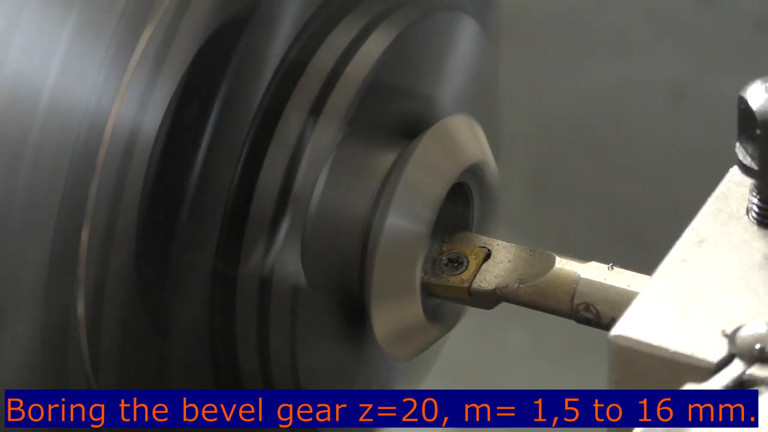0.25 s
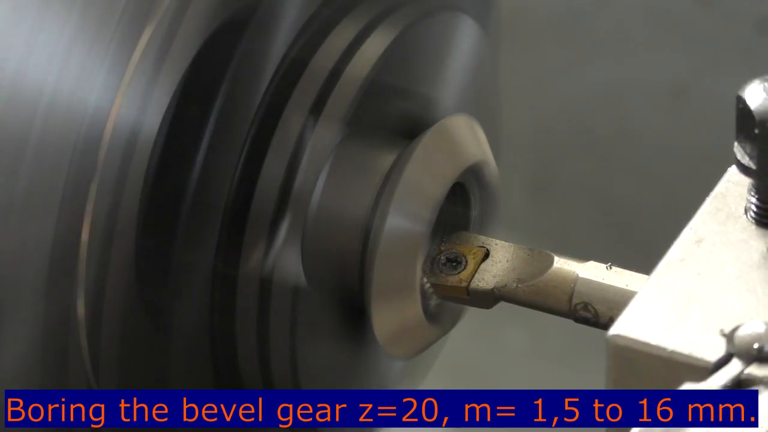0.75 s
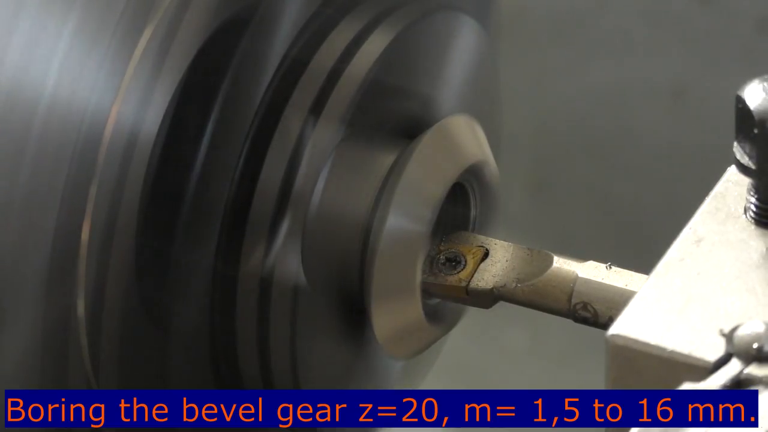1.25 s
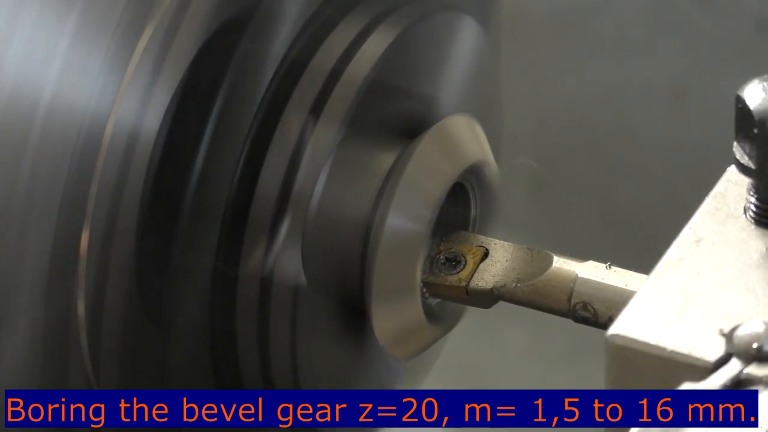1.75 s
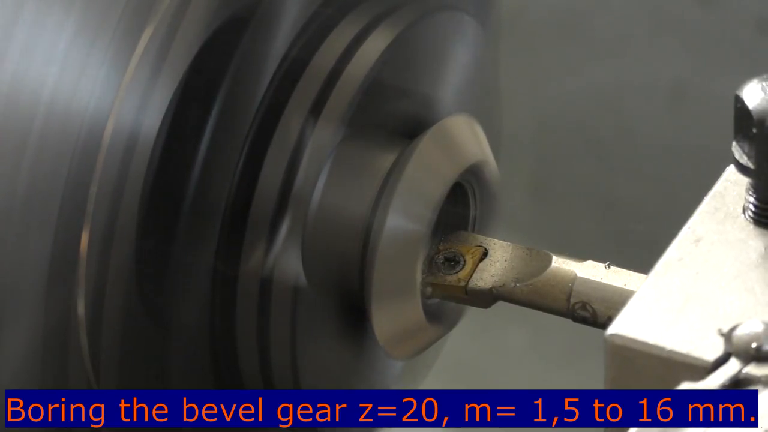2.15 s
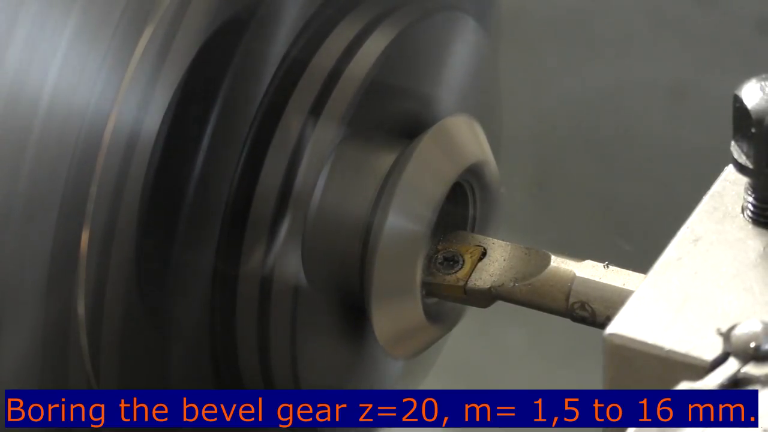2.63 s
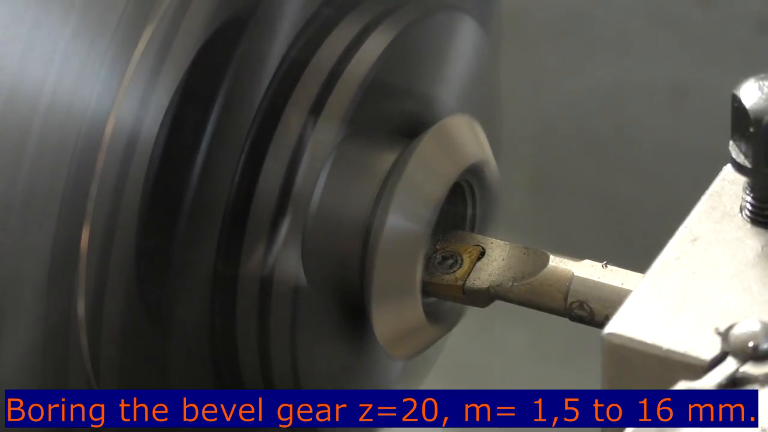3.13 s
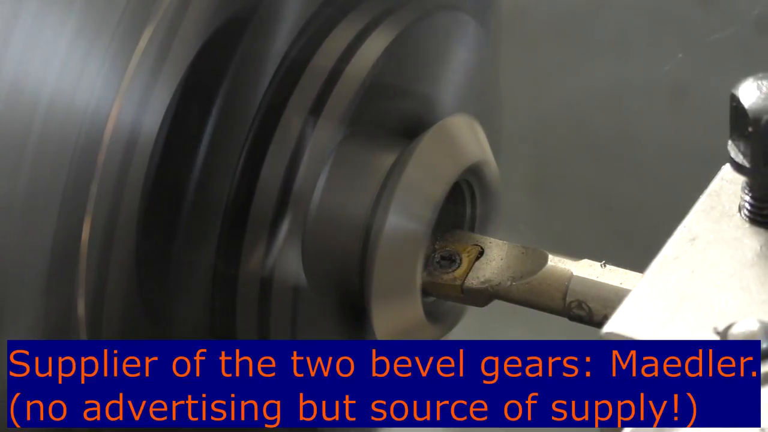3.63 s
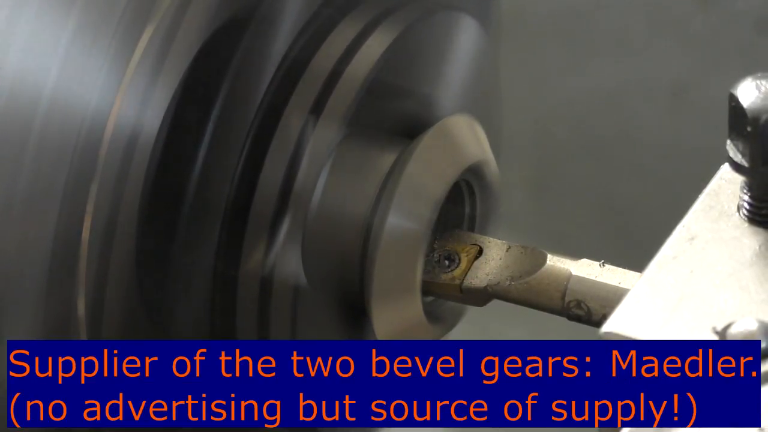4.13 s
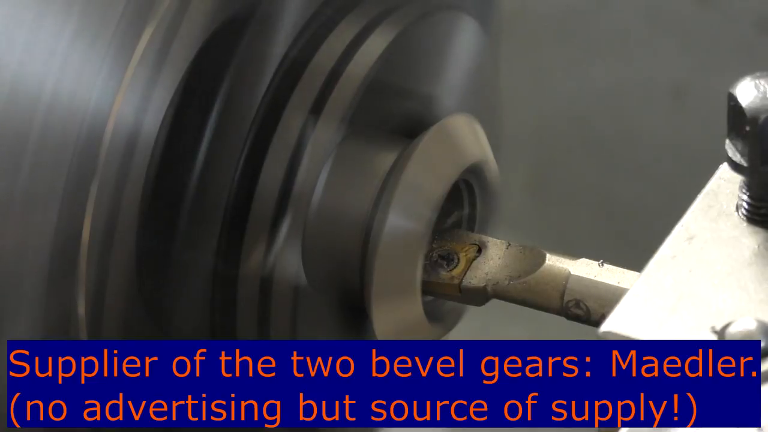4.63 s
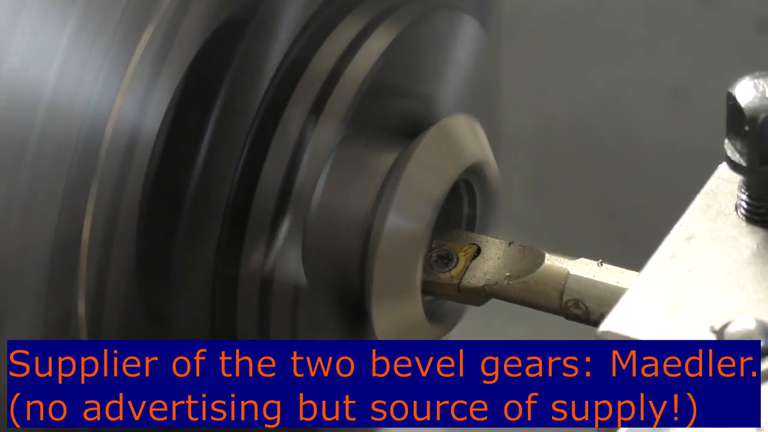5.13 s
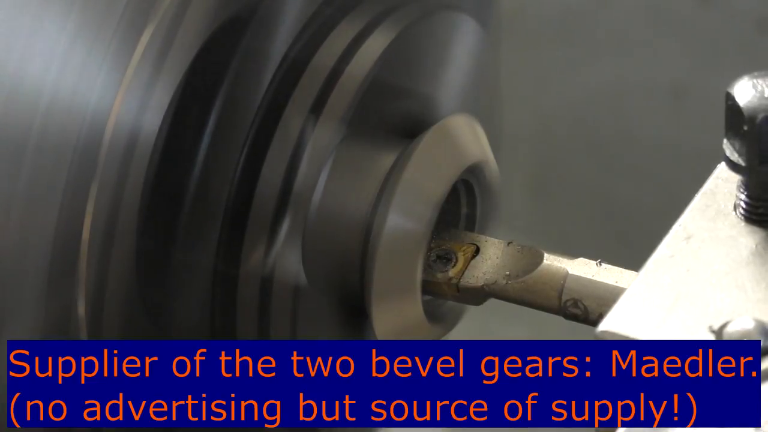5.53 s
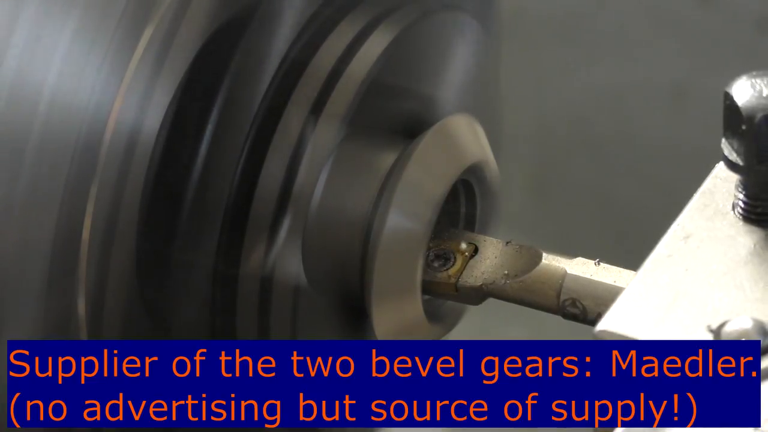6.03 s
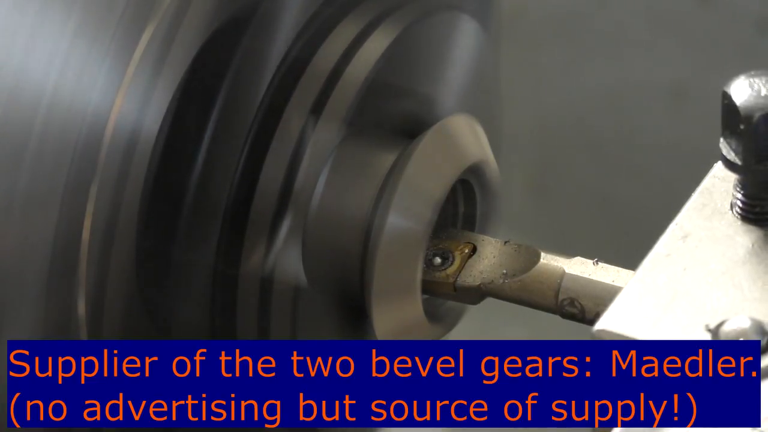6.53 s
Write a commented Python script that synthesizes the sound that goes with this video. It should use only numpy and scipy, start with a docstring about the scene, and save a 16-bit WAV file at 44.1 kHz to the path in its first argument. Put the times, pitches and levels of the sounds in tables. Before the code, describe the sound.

Close to a lathe in a workshop, a tool bores into turning steel with a fine, uneven hiss and a high metallic ring. The tool chirps several times, breaks into a piercing half-second squeal, then eases back. A second run of chirps and brief squeals follows past the middle before the ringing softens. Underneath, the machine rumbles and its motor whines in thin, wavering tones throughout.

```python
"""Boring steel on a lathe

A boring bar, a long tool holder, cuts inside a turning steel part. It rings near 3 kHz and
at times shakes hard enough to chirp or squeal: this is called chatter. The chip (the shaving)
hisses, the motor drive whines in thin tones, and the gears and machine bed rumble.
An automatic volume control turns everything down when the chatter gets loud."""
import sys
import numpy as np
from scipy import signal
from scipy.fft import rfft, irfft, next_fast_len
from scipy.io import wavfile
from scipy.ndimage import uniform_filter1d

SR = 44100
rng = np.random.default_rng(int(sys.argv[2]) if len(sys.argv) > 2 else 0)


def wav_out(sig):
    """Save sig, one row per channel (or a flat mono array), as 16-bit PCM at SR to the path in sys.argv[1]."""
    wavfile.write(sys.argv[1], SR, np.round(np.clip(np.atleast_2d(sig).T, -1, 1) * 32767).astype(np.int16))


N = 298998
T = np.arange(N) / SR
STUTTER_DB, STUTTER_HZ = 2.5, 130  # how much and how fast the grip of the cut varies


# The bar's ringing between bursts: t/s, level/dB
BAR_RINGING = [(0, -68), (.15, -42), (.35, -38.5), (.55, -35), (.7, -54), (.9, -31.5), (1.05, -27),
               (1.85, -26), (2.0, -38), (2.3, -33.5), (2.9, -37), (3.2, -45), (3.8, -37), (4.2, -34.5),
               (4.57, -41.5), (4.66, -33.5), (5.0, -31.5), (5.4, -38.5), (5.8, -40.5), (6.78, -40)]
# Short bursts of chatter: peak t/s, hold/s, level/dB, third harmonic/dB
CHATTER_BURSTS = [(0.152, .008, -30.5, -66), (0.189, 0.0091, -34, -66), (0.367, .025, -29, -66),
                  (0.422, .012, -19.5, -40), (0.503, 0.0074, -26, -66), (0.607, 0.0048, -27, -52),
                  (0.914, .004, -23.5, -58), (1.022, .004, -21, -55), (1.064, 0.011, -17.5, -60),
                  (1.681, 0.0049, -15.5, -43), (1.768, 0.028, -16, -36.5), (1.888, 0.011, -16.5, -38),
                  (2.45, 0.0081, -24.5, -52), (3.468, 0.0018, -31.5, -62), (3.66, .002, -29.5, -62),
                  (4.15, 0.031, -27, -65), (4.239, 0.0025, -19.5, -41), (4.277, 0.0023, -22, -50),
                  (4.342, .004, -26.5, -50), (4.717, 0.046, -17, -39), (4.786, 0.012, -22, -57),
                  (4.848, 0.075, -17.5, -52), (4.982, .006, -20.5, -44), (5.1, .005, -26.5, -61),
                  (5.27, .002, -26, -60), (5.31, 0.0028, -28.5, -60), (5.49, 0.0034, -30, -62),
                  (5.538, .002, -29.5, -62)]
# The long squeal, the edge leaving and hitting the metal: t/s, level/dB, third/dB, fifth harmonic/dB
LONG_SQUEAL = [(1.09, -28, -70, -70), (1.122, -12.5, -48, -53), (1.2, -11.5, -41, -36),
               (1.337, -8.5, -38, -34), (1.42, -8.5, -41, -27), (1.467, -12, -35, -28),
               (1.492, -16, -39, -23), (1.527, -11, -40, -25), (1.566, -12, -33, -25), (1.6, -12, -33, -20),
               (1.648, -10.5, -39, -40), (1.668, -46, -52, -56), (1.73, -80, -74, -64)]

def chatter():
    """How hard the bar shakes, in dB: the strongest of ringing, bursts and squeal wins."""
    squealing = (T > LONG_SQUEAL[0][0]) & (T < LONG_SQUEAL[-1][0])
    level_db, third_db, fifth_db = (np.where(squealing, curve(LONG_SQUEAL, k), -120.) for k in (1, 2, 3))
    level_db = np.maximum(level_db, curve(BAR_RINGING) + STUTTER_DB * drift(STUTTER_HZ))
    rise_db_per_s, fall_db_per_s = 435, 467
    for peak, hold, peak_db, harmonic_db in CHATTER_BURSTS:
        fade_db = rise_db_per_s * np.maximum(peak - T, 0) + fall_db_per_s * np.maximum(T - peak - hold, 0)
        level_db = np.maximum(level_db, peak_db - fade_db)
        third_db = np.maximum(third_db, harmonic_db - 1.5 * fade_db)
    return level_db, third_db, fifth_db


# The bar's pitch, higher when the cut grips harder: t/s, f/Hz
BAR_PITCH = [(0, 2958), (.3, 2950), (.38, 2983), (.43, 2986), (.52, 2954), (.75, 2922), (.92, 2927),
             (1.13, 2953), (1.2, 2971), (1.52, 2996), (1.6, 2991), (1.68, 2956), (1.89, 2951), (2.3, 2927),
             (4.1, 2916), (4.3, 2927), (4.55, 2930), (4.72, 2948), (4.82, 2932), (4.91, 2947), (5.1, 2928),
             (6.78, 2921)]

def boring_bar(level_db, third_db, fifth_db):
    """Shaken gently, the bar rings roughly; shaken hard, it locks into a clean tone."""
    locked = np.interp(level_db, [-40, -30, -14], [0, .93, .995])
    pole = np.exp(-np.pi * 55 / SR)  # keeps only slow changes, below about 55 Hz
    white = rng.standard_normal((4, N))
    slow = [evened(signal.lfilter([1], [1, -2 * pole, pole ** 2], row)) for row in white]
    shake, jitter = slow[0] + 1j * slow[1], slow[2] + 1j * slow[3]
    phase = 2 * np.pi * np.cumsum(curve(BAR_PITCH) + 6 * drift(top_hz=45)) / SR
    rough = shake + np.array([[.25], [-.25]]) * jitter  # pairs like this are left and right
    clean = np.sqrt(2) * np.exp([[-.12j], [.12j]])
    swing = locked * clean + np.sqrt(1 - locked ** 2) * rough
    tone = amp(level_db + np.array([[-1.3], [1.3]])) * (swing * np.exp(1j * phase)).real
    flutter_db = 2.0 * drift(top_hz=149.8)
    ragged = 1.05 + .62 * jitter  # no two blows of the edge are alike
    second_db = 0.75 * level_db - 31.0  # the swing is a little lopsided
    fourth_db = 0.71 * fifth_db - 14
    harmonics = sum(amp(db + flutter_db) * (ragged * np.exp(1j * k * phase)).real  # k times the pitch
                    for k, db in [(2, second_db), (3, third_db), (4, fourth_db), (5, fifth_db)])
    return tone + amp([[-1.2], [1.2]]) * harmonics


# Loudness of the hiss before chatter lifts it: t/s, level/dB
HISS_LEVEL = [(.09, -49.5), (.15, -44.5), (.5, -47.5), (1, -46.5), (2, -45.5), (4, -46), (4.6, -47.5),
              (5.05, -40), (6, -48), (6.78, -44)]
# Tone colour of the hiss: f/Hz, relative level/dB
HISS_COLOUR = [(4000, -32), (6800, -47), (6900, -15), (7400, -4), (7470, -13), (7990, -10.5), (8070, -17.5),
               (8780, -6), (10100, -6.5), (10300, -6.5), (12700, -2), (14000, -3), (15700, -7)]
# Thin rings in the hiss: f/Hz, width/Hz, level against the hiss/dB
HISS_RINGS = [(13650, 120, -9), (14050, 150, -14), (14430, 180, -15), (13300, 80, -19), (12050, 200, -18)]
# Notes at which bar and part sing along: f/Hz, width/Hz, level/dB
PART_RINGS = [(2824, 102, -40.5), (2773, 52, -47.5), (3003, 87, -48), (2450, 83, -47.5), (3256, 110, -50.5)]

def chip(bar_db):
    """The chip hisses in uneven spurts, louder during chatter, and sets bar and part ringing."""
    spurts_db = 0.71 * drift(top_hz=17) + 1.1 * drift(top_hz=300)
    hiss = evened(noise(lambda hz: amp(look_up(HISS_COLOUR, hz)) * np.clip((hz - 6000) / 1500, 0, 1)))
    rings = amp(1.8 * drift(top_hz=29.6)) * ringing_noise(HISS_RINGS)
    lift_from_db, smooth_s = -26, 0.091
    lift_db = .35 * uniform_filter1d(np.maximum(bar_db - lift_from_db, 0), round(smooth_s * SR))
    bite = np.clip((T - .08) / 0.11, .1, 1)  # the edge enters the metal
    part = bite * amp(STUTTER_DB * drift(STUTTER_HZ)) * ringing_noise(PART_RINGS)
    return amp(curve(HISS_LEVEL) + lift_db + spurts_db) * (hiss + rings) + part


# Tones of the motor drive: f/Hz, level/dB
DRIVE_TONES = [(5023.3, -63.9), (5112.1, -51.6), (5377.9, -59.3), (5466.7, -57.3), (5554.9, -45.1),
               (5732.5, -53.3), (5777.6, -56.4), (5821.4, -55.7), (5910.2, -43.2), (5998.3, -58.9),
               (6087.2, -47.7), (6221.1, -59.5), (6264.8, -42.7), (6309.2, -60.3), (6353.6, -59.7),
               (6442.5, -39.8), (6664.5, -57.2), (6885.9, -57.0), (7107.3, -50.4), (7151.0, -52.5),
               (7283.6, -62.7), (7683.3, -51.4), (7860.3, -63.7), (8126.8, -67.3), (10579.5, -57.8),
               (11111.8, -65.4), (11465.1, -59.9), (11819.7, -64.6), (12352.7, -66.6), (12530.3, -64.6)]
# Wavering of the four loudest tones, by pitch: t/s, lowest/dB, second/dB, upper two/dB
DRIVE_SWELL = [(0, -5, 5, 0), (.25, 3, 1, 1.5), (.43, -1, -5, 0.5), (.64, 3.9, -4, 1), (1, -3, -1, -.5),
               (1.4, -1, -1, 3.5), (1.85, -7, -1, -1.5), (2.15, -.7, 0, -3), (3.15, 3, -8, -1.5),
               (3.4, -1.5, -3, -3.5), (3.72, 1.5, -4, 0), (3.9, 0, 2, -2), (4.34, 1, 1.5, -1),
               (4.85, 2, 3, 2.5), (6.09, -3.5, 1, 1.5), (6.78, -.4, -1, -0.3)]
# Outline of the faint side tones: f/Hz, level/dB
SIDE_TONES = [(4800, -74), (5300, -69), (5600, -65), (6400, -65), (7000, -70), (8300, -75)]

def motor_drive():
    """Fast electrical switching whines in wavering tones over a faint, evenly spaced row of others."""
    whine = np.zeros((2, N))
    loudest = sorted(hz for hz, db in DRIVE_TONES if db > -46)
    for hz, db in DRIVE_TONES:
        if hz in loudest:
            swell_db = curve(DRIVE_SWELL, column=min(1 + loudest.index(hz), 3))
        else:
            swell_db = 1.2 * drift(top_hz=2.5)
        lag = rng.normal(0, 0.2) * np.array([[-1], [1]]) * (hz < 6800)  # higher tones sit in the centre
        whine += amp(db + swell_db) * np.sqrt(2) * np.cos(2 * np.pi * (hz * T + rng.random()) + lag)
    switching_hz, spacing_hz = 5998.7, 44.35
    for hz in switching_hz + spacing_hz * np.arange(-27, 52):
        if min(abs(hz - tone_hz) for tone_hz, _ in DRIVE_TONES) > 9:  # skip pitches already taken
            side_db = look_up(SIDE_TONES, hz) + rng.normal(0, 2.5)
            whine += amp(side_db) * np.sqrt(2) * np.cos(2 * np.pi * (hz * T + rng.random()))
    return whine


# Tone colour of the rumble: f/Hz, relative level/dB
RUMBLE_COLOUR = [(18, -52), (30, -31), (188, -8.5), (297, -11), (424, -6.5), (513, -15), (717, -9),
                 (1050, -12), (1210, -11), (2100, -14), (2860, -10.5), (3230, -17.5), (4610, -20),
                 (6290, -20.5), (9000, -27.5), (11700, -30.5), (19800, -120)]
# Notes at which gear case and covers ring: f/Hz, width/Hz, level/dB
COVER_RINGS = [(321.6, 21, -51), (406.7, 4.4, -52.5), (427.3, 12.4, -48.5), (594, 13, -52),
               (748.3, 21, -49), (1191, 122, -43.5), (1250.5, 31, -47), (1710, 29, -49.5),
               (1842, 91, -51.5), (5900, 840, -58.5)]
# Low notes of the bed and spindle housing: f/Hz, width/Hz, level/dB
BED_RINGS = [(91.2, 12, -53), (139, 24, -51.5), (177.7, 7.2, -39.5), (194.5, 32, -42.5), (239, 31, -43),
             (261, 28, -48.5)]
# How those low notes swell and sink: t/s, level change/dB
BED_SWELL = [(0, -3), (.3, 3), (.55, -2.5), (.8, 1), (1.6, -2.5), (2, 1.5), (2.6, -2.5), (3.25, 3.5),
             (3.6, -2), (4.6, 0), (6.2, 1.5), (6.78, 1.5)]
# A low motor tone that grows later on: t/s, level/dB
MOTOR_DRONE = [(0, -68), (.8, -56), (3.7, -52), (4.5, -60), (5, -47.5), (5.5, -57.5), (5.75, -47.5),
               (6.4, -47.5), (6.78, -50)]

def lathe_body():
    """The running machine rumbles, its covers ring, its bed booms, and motor and mains power hum."""
    rumble_db = -33.5 + 0.42 * drift(top_hz=6)
    rumble = amp(rumble_db) * evened(noise(lambda hz: amp(look_up(RUMBLE_COLOUR, hz))))
    mains_hz, drone_hz = 62.4, 88.9
    hum = amp(-61.5) * np.sqrt(2) * np.sin(2 * np.pi * mains_hz * T + np.array([[-.4], [.4]]))
    drone_db = curve(MOTOR_DRONE) + 1.5 * drift(top_hz=6.9)
    drone = amp(drone_db) * np.sqrt(2) * np.sin(2 * np.pi * drone_hz * T + 0.68 * drift(top_hz=4.6))
    covers = ringing_noise(COVER_RINGS)
    boom = amp(curve(BED_SWELL)) * ringing_noise(BED_RINGS)
    return rumble + covers + boom + hum + drone


# How alike the workshop makes left and right: f/Hz, likeness from 0 to 1
STEREO_LIKENESS = [(60, 0.38), (110, 0.97), (200, 1), (380, 0.91), (700, 0.68), (1290, 0.6), (2380, 0.68),
                   (4400, 0.72), (8120, 1), (15000, 1.0)]
# How much louder the left is than the right: f/Hz, level/dB
STEREO_BALANCE = [(60, -2.0), (110, -2.0), (200, -4.0), (380, -2.0), (700, -1.0), (1290, -0.5),
                  (2380, -3.0), (4400, 0.5), (8120, -0.5), (15000, 0.0)]

def noise(gain):
    """Stereo noise, with gain(hz) setting the strength of each frequency."""
    size = next_fast_len(N)
    hz = np.fft.rfftfreq(size, 1 / SR)
    middle, side = rfft(rng.standard_normal((2, size)))
    likeness = np.clip(look_up(STEREO_LIKENESS, hz), 0, 1)
    middle, side = middle * np.sqrt((1 + likeness) / 2), side * np.sqrt((1 - likeness) / 2)
    lean = amp(look_up(STEREO_BALANCE, hz) / 2)
    return irfft(gain(hz) * np.array([(middle + side) * lean, (middle - side) / lean]), size)[:, :N]


def ringing_noise(rings):
    """Metal shaken at random rings in a narrow band around each of its own notes."""
    def gain(hz):
        return np.sqrt(sum(amp(db) ** 2 * 2 * SR / (np.pi * width) / (1 + (2 * (hz - f) / width) ** 2) ** 2
                           for f, width, db in rings))
    return noise(gain)


def drift(top_hz):
    """A random wobble of typical size 1, no faster than top_hz."""
    t = T[::64]
    rates_hz = np.geomspace(top_hz / 12, top_hz, 12)
    wobble = sum(np.sin(2 * np.pi * (hz * t + rng.random())) / np.sqrt(hz) for hz in rates_hz)
    return np.interp(T, t, evened(wobble))


def curve(rows, column=1):
    """Join a table's points with straight lines over time."""
    return np.interp(T, *np.transpose(rows)[[0, column]])


def look_up(rows, hz):
    """A table's value at any frequency."""
    f, value = np.transpose(rows)
    return np.interp(np.log(hz + 1), np.log(f + 1), value)


def amp(db):
    """Turn decibels into a multiplier."""
    return 10 ** (np.asarray(db) / 20)


def evened(x):
    """Scale a signal to an average power of 1."""
    return x / np.sqrt(np.mean(x ** 2) + 1e-20)


def scene():
    """All sources together; the chatter steers both bar and chip."""
    level_db, third_db, fifth_db = chatter()
    return lathe_body() + motor_drive() + chip(level_db) + boring_bar(level_db, third_db, fifth_db)


def too_loud_db(dry, smooth_s, fall_db_per_s, limit_db=-24.0):
    """How far the smoothed level is over the limit; it rises at once and falls at a set speed."""
    power = uniform_filter1d((dry ** 2).mean(0), round(smooth_s * SR))
    level_db = 10 * np.log10(abs(power) + 1e-12)
    held_db = np.maximum.accumulate(level_db + fall_db_per_s * T) - fall_db_per_s * T
    return np.maximum(held_db - limit_db, 0)


def record(dry):
    """The volume control lets go fast after a chirp, slowly after a squeal; the top treble is cut."""
    fast_db = too_loud_db(dry, smooth_s=0.0092, fall_db_per_s=37)
    slow_db = too_loud_db(dry, smooth_s=0.038, fall_db_per_s=13.3)
    cut_db = 0.77 * uniform_filter1d(np.maximum(fast_db, slow_db), 900)
    low_pass = signal.firwin(2047, cutoff=15735, window=("kaiser", 9), fs=SR)
    return signal.oaconvolve(dry / amp(cut_db), low_pass[None], "same")


dry = scene()
out = record(dry)
wav_out(out)
```